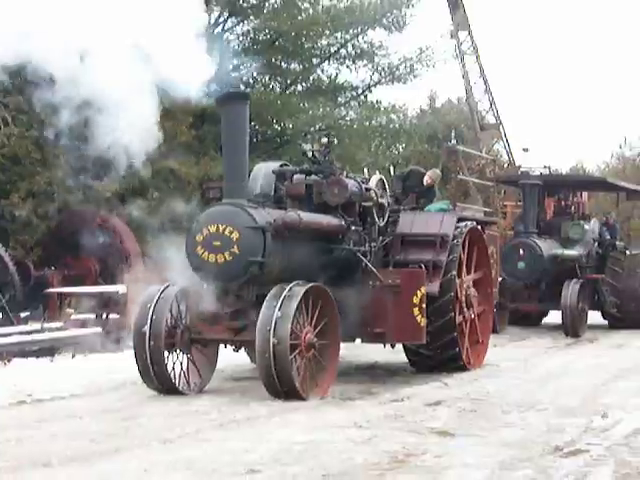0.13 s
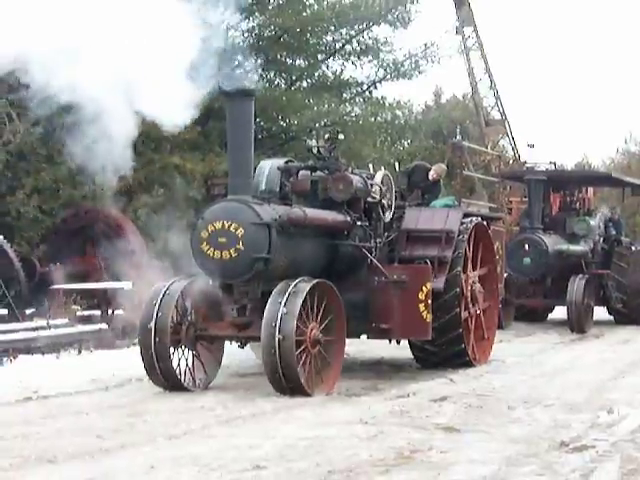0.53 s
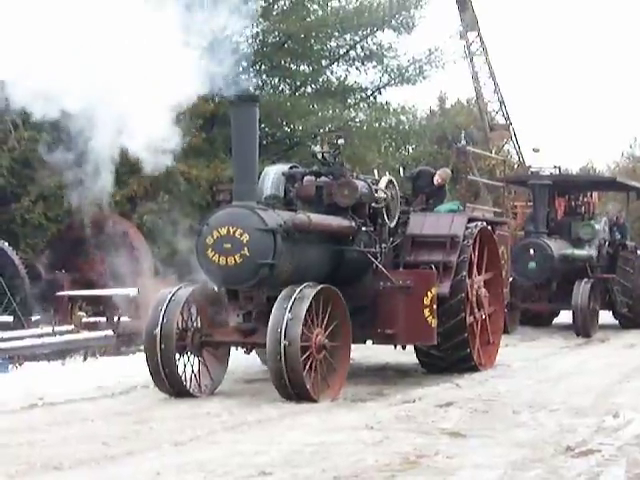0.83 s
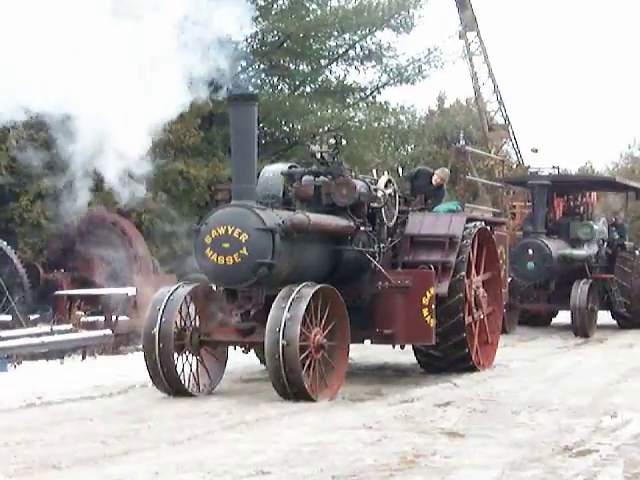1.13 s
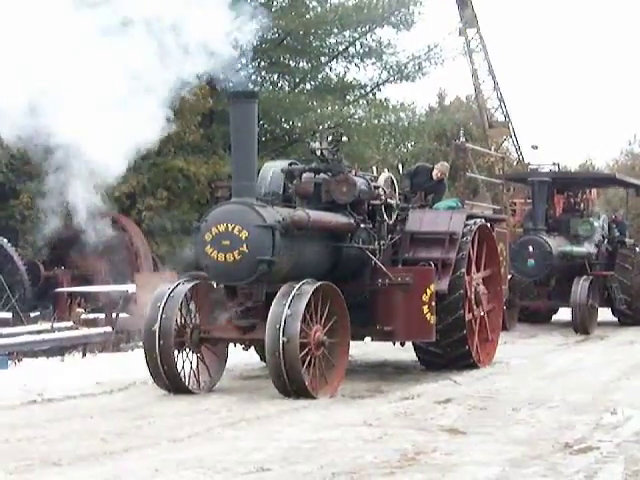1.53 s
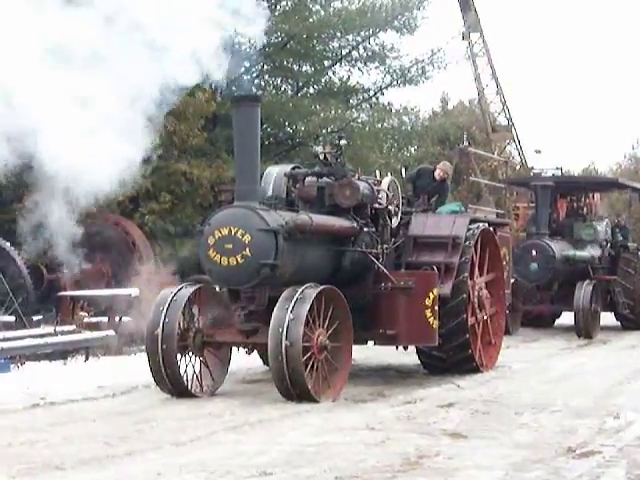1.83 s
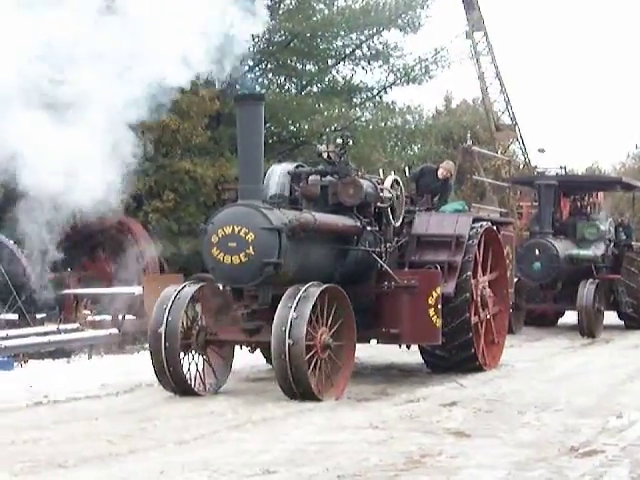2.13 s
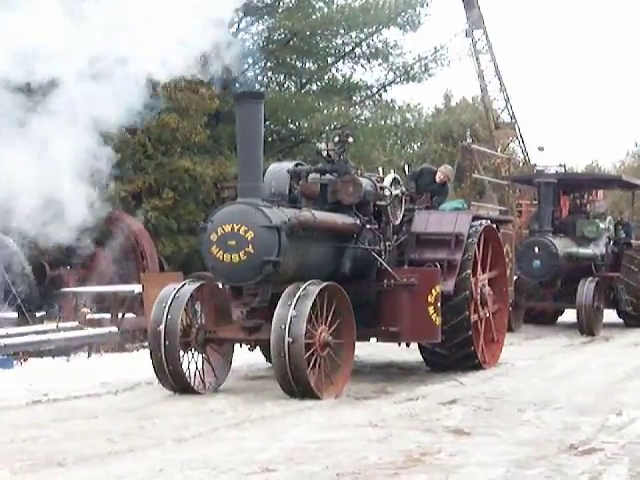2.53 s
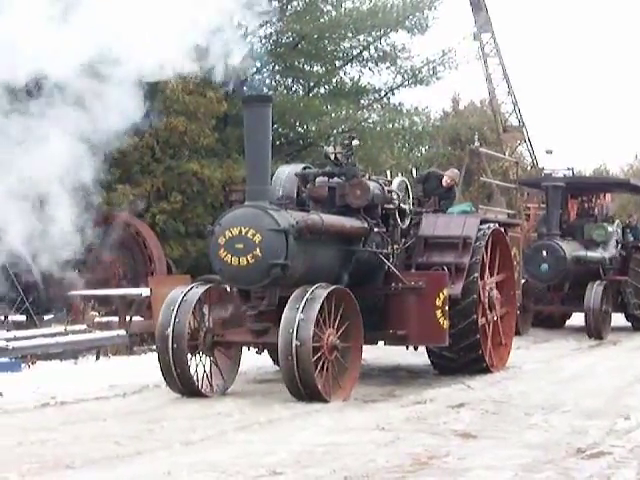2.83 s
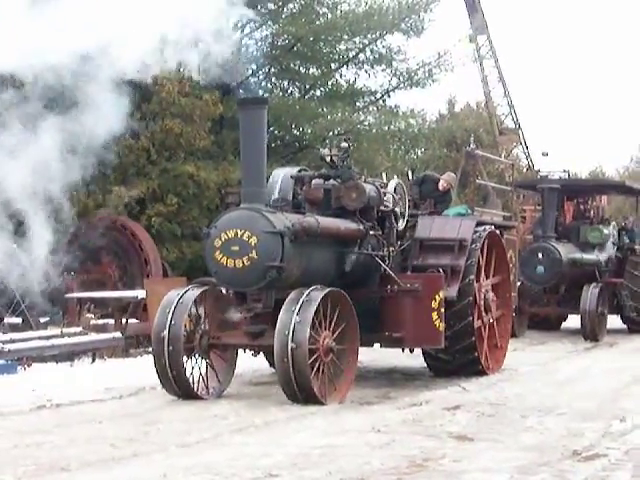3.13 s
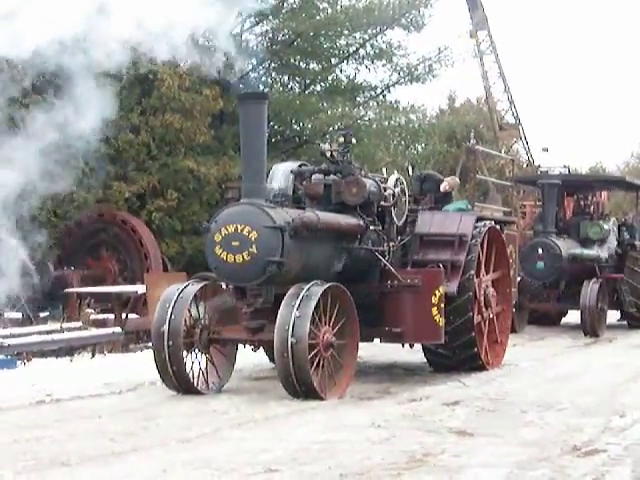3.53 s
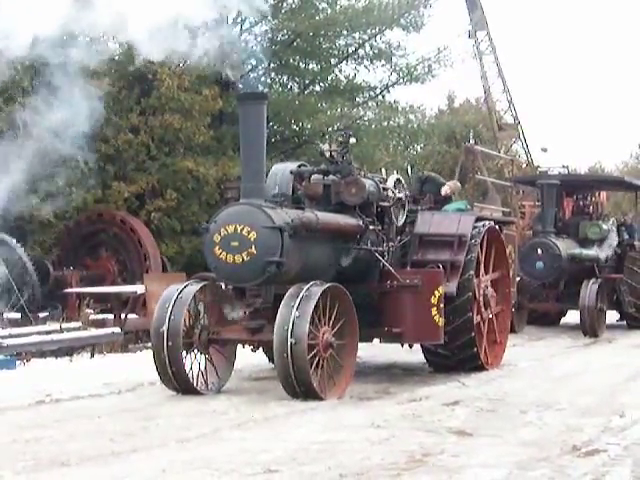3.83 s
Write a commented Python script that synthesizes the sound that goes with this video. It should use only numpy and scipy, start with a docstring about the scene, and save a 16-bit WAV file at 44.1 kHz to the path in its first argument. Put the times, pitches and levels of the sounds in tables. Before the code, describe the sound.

After a brief silence, a slow-rolling steam engine starts abruptly: deep exhaust thumps, clanking gear knocks, bursts of crackling steam, sharp metallic ticks and thin squeaks on the left, the rumble easing later. Outdoors, stereo microphone with dull top.

```python
"""Gravel yard: a steam traction engine rolls slowly. The exhaust thumps, strong and weak in turn, as
pressure pulses with a chimney ring, over gear and wheel rumble made of banded noise and decaying knocks.
Steam hisses in bursts of noise with bursting droplets over a steady leak; the valve gear ticks in decaying
sines and noise cracks, a dry bearing squeaks in gliding near sines, and one deep hum swells and fades."""
import sys
import numpy as np
from scipy import signal
from scipy.fft import rfft, irfft
from scipy.io import wavfile

SR = 44100
rng = np.random.default_rng(int(sys.argv[2]) if len(sys.argv) > 2 else 0)


def wav_record(signal):
    """Record a signal, one row per channel, as 16-bit PCM in the file named by sys.argv[1]."""
    frames = np.transpose(np.atleast_2d(signal))
    bounded = np.clip(frames, -1, 1)
    # unit amplitude maps onto the largest positive 16-bit level
    quanta = np.round(bounded * 32767).astype(np.int16)
    wavfile.write(sys.argv[1], SR, quanta)


N = 176400

# Stereo lean of noise and droplets. Each row: frequency in Hz, left minus right in dB.
LEAN = [(30, -4), (130, 3.5), (300, 2), (560, 1.5), (1180, 2.5), (1720, 1), (2500, -3), (3620, -5),
        (4500, -5.5), (5260, 7), (6500, 15.5), (7640, 2)]


def amp(db):
    """Amplitude factor of a level in dB."""
    return 10 ** (np.asarray(db) / 20)


def rms_one(x):
    """Scales to an rms of 1."""
    return x / np.sqrt(np.mean(x ** 2) + 1e-20)


def in_time(rows):
    """Interpolates each column over the samples; the first column is time in seconds."""
    s, *columns = np.transpose(rows)
    return [np.interp(np.arange(N) / SR, s, c) for c in columns]


def at_hz(points, hz):
    """Reads a (Hz, value) table on a log frequency axis."""
    points = np.array(points)
    return np.interp(np.log(hz), np.log(points[:, 0] + 1e-9), points[:, 1])


def drift(corner_hz):
    """Slow random signal with rms 1: twice low-passed noise, made at SR / 40."""
    step, settle = 40, 2000
    r = np.exp(-2 * step * np.pi * corner_hz / SR)
    noise = rng.standard_normal(N // step + settle + 2)
    slow = signal.lfilter([1], [1, -2 * r, r * r], noise)[settle:]
    return np.interp(np.arange(N) / step, np.arange(len(slow)), rms_one(slow))


def add(out, s, sound):
    """Mixes a sound in at a time in seconds."""
    i = int(s * SR)
    out[..., i:i + sound.shape[-1]] += sound[..., :N - i]


def late(x, s):
    """Delays by a time in seconds."""
    return np.interp(np.arange(N) - s * SR, np.arange(N), x, left=0)


def pan(left_right_db):
    """Left and right gains that differ by this many dB."""
    return amp([[left_right_db / 2], [-left_right_db / 2]])


def dull(x):
    """Takes the top off ticks and crackle on their way to the microphone."""
    return signal.sosfilt(signal.butter(4, 6570, fs=SR, output="sos"), x + 1e-18)


def coloured(source, colour, swing_db, patchy_db, flicker_hz):
    """Two noises in third-octave bands, each with its level law, flicker, lean and likeness."""
    # Each row: frequency in Hz, left-right likeness (0-1).
    likeness = [(30, 0.89), (300, .99), (700, 0.87), (1100, .75), (1800, 0.37), (2800, 0.34), (5000, 0.17),
                (8000, 0.3)]
    low_hz, high_hz = colour[0][0], colour[-1][0]
    hz = np.maximum(np.arange(N // 2 + 1) * SR / N, 1)
    shape = amp(at_hz(colour, hz)) * (hz > low_hz) * (hz < high_hz)
    spectrum = rfft(source) * shape / np.sqrt(np.mean(shape ** 2))
    out, together = 0, drift(flicker_hz)
    for mid_hz in low_hz * 2 ** np.arange(0, np.log2(high_hz / low_hz) + .34, 1 / 3):
        mask = np.cos(np.pi / 2 * np.clip(3 * np.log2(hz / mid_hz), -1, 1)) ** 2
        mid, side = irfft(spectrum * mask, N)
        alike = np.clip(at_hz(likeness, mid_hz), 0, 1)
        flicker_db = patchy_db * (0.37 * together + drift(flicker_hz))
        gain = amp(swing_db(mid_hz) + flicker_db) / np.sqrt(2)
        stereo = np.sqrt(1 + alike) * mid + np.sqrt(1 - alike) * side * [[1], [-1]]
        out = out + gain * pan(at_hz(LEAN, mid_hz)) * stereo
    return out


def chuffs():
    """Each beat pushes, dips sharply and rebounds, echoed by a shed wall; the dip rings the chimney."""
    # Each row: dip time in seconds, dip depth in dB, dip width (two sigmas) in ms, chimney ring in dB.
    beats = [(0.432, -9, 5.2, -14), (0.625, -5, 6, -6), (.768, -11.5, 7.2, -27), (.961, -3.5, 4.3, -13.5),
             (1.108, -11, 8.0, -18.5), (1.297, -8, 4.5, -8), (1.443, -11, 6.4, -41), (1.633, -7, 4.8, -9),
             (1.78, -10.5, 6.9, -21.5), (1.973, -5, 5.0, -8.5), (2.12, -11.5, 14, -21),
             (2.316, -3, 3.54, -35), (2.468, -8.5, 8.9, -16.5), (2.657, -6, 3.74, -7),
             (2.812, -11.5, 6.3, -21), (2.999, -7, 4, -25), (3.156, -16, 6.7, -20), (3.35, -8, 4.6, -17.5),
             (3.502, -11.5, 6.6, -26), (3.697, -8.5, 4.7, -15), (3.849, -11, 8.0, -25)]
    # Lead, lag and width in dip sigmas.
    push_share, push_lead, push_width = 0.7, 7.75, 1.6
    rebound_share, rebound_lag, rebound_width = 0.46, 5.5, 1.6
    chimney_hz, chimney_rise_s, chimney_t60_s = 141, 0.012, 0.25
    echo_s, echo_db = 0.0306, -9
    air, rings = np.zeros(N), np.zeros(N)
    u = np.arange(-.06, .3, 1 / SR)  # seconds from the dip
    for s, db, width_ms, ring_db in beats:
        w = 2000 * u / width_ms
        push = push_share * np.exp(-((w + push_lead) / push_width) ** 2 / 2)
        dip = np.exp(-w ** 2 / 2)
        rebound = rebound_share * np.exp(-((w - rebound_lag) / rebound_width) ** 2 / 2)
        add(air, s + u[0], amp(db) * (push - dip + rebound))
        swell = np.clip(u / chimney_rise_s + .5, 0, 1) * amp(-60 * np.maximum(u, 0) / chimney_t60_s)
        add(rings, s + u[0], -amp(ring_db) * swell * np.cos(2 * np.pi * chimney_hz * u))
    return (air + amp(echo_db) * late(air, echo_s) + rings) * pan(-.6)


def rumble():
    """Lumpy noise of gears and wheels in the resonances of boiler and wheels."""
    # Each row: time in seconds, level in dB, deep bass level in dB, both before the settings below.
    levels = [(0.37, -21, -47), (0.38, -26, -21), (0.43, -14.5, -57), (0.47, -22, -26), (0.49, -13.5, -34),
              (0.51, -21, -24.5), (0.64, -21.5, -34.5), (0.75, -20.5, -25.5), (0.83, -21.5, -26.5),
              (0.97, -22, -44.5), (1.0, -21.5, -22.5), (1.22, -21, -33.5), (1.24, -18.5, -11),
              (1.3, -21, -31), (1.32, -14, -32.5), (1.39, -23.5, -29.5), (1.55, -24, -28.5),
              (1.97, -24, -32), (1.98, -19.5, -32), (2.06, -27, -27), (2.08, -20.5, -17),
              (2.11, -26.5, -31), (2.19, -21.5, -34.5), (2.21, -28, -27), (2.25, -17, -23),
              (2.35, -21, -34.5), (2.68, -22.5, -40), (2.79, -33.5, -53), (3.06, -29, -35.5),
              (3.28, -30.5, -44), (3.33, -28, -36.5), (3.7, -31, -40), (3.82, -23.5, -42.5),
              (3.93, -33, -34.5), (3.95, -28, -35.5), (4.0, -33, -45)]
    # Each row: frequency in Hz, relative density in dB per Hz.
    colour = [(12, -61), (20, -24.5), (27, -5.5), (49, 2.5), (103, -4), (196, -10), (260, -7.5), (318, 0.5),
              (374, -4), (584, -15.5), (790, -13.5), (948, -22.5), (1030, -17.5), (1260, -26.5),
              (1740, -24.5), (1960, -28.5), (2500, -29), (3250, -63), (5500, -120)]
    bass_below_hz, trim_db, bass_follows = 160, 2, 0.34
    level_db, bass_db = in_time(levels)
    # Bass swings are shrunk and centred on the mean level.
    bass_db = level_db.mean() + bass_follows * (bass_db - bass_db.mean())

    def swing_db(hz):
        return trim_db + (bass_db if hz < bass_below_hz else level_db)

    return coloured(rng.standard_normal((2, N)), colour, swing_db, patchy_db=2.0, flicker_hz=13)


def knocks():
    """Heavy knocks in the gear train: sines with a quick rise and exponential decay."""
    # Each row: start in seconds, level in dB before the trim, pitch in Hz.
    rows = [(0.397, -0.5, 447), (0.415, -7, 330), (0.428, -12, 326), (0.484, -4, 318), (0.534, -13, 334),
            (0.902, -3, 376), (0.944, 3.5, 455), (1.23, 2.5, 343), (1.304, -15, 398), (1.319, -3, 323),
            (1.355, -13, 326), (1.692, -13, 358), (1.974, 2, 350), (2.22, -13, 285), (2.278, -8, 344),
            (2.407, -20, 330), (2.55, -8, 355)]
    t60_s, rise_s, trim_db = 0.065, 0.0049, -10
    out, u = np.zeros((2, N)), np.arange(0, .2, 1 / SR)
    for s, db, hz in rows:
        envelope = np.minimum(u / rise_s, 1) * amp(db + trim_db - 60 * u / t60_s)
        add(out, s, envelope * np.sin(2 * np.pi * hz * u) * pan(1.6))
    return out


def steam():
    """Jet noise with droplets spattering and crackling in it; fuller bursts reach lower."""
    # Each row: time in seconds, level in dB before the trim, lift of the lower hiss in dB (mean removed).
    bursts = [
        [(0.345, -41, 8), (0.369, -31.5, 0.5), (0.519, -36.5, 3), (0.585, -31, -8.5), (0.631, -42, 7),
         (0.685, -27.5, 2), (0.695, -19.5, -8.5), (0.817, -34, 1), (0.861, -31.5, -2.5), (0.907, -41, 3),
         (0.921, -20.5, -3), (0.941, -27, -2), (0.953, -19, 3.5), (0.973, -26.5, 0.5), (1.043, -26.5, -0.5),
         (1.053, -21, -8), (1.063, -26, -1), (1.103, -33, 3.5), (1.169, -40, -2), (1.203, -26.5, 3.5),
         (1.303, -34, -1.5), (1.385, -26, -7), (1.389, -37, 3), (1.439, -38.5, -7), (1.465, -25.5, -12.5),
         (1.475, -37.5, 0), (1.565, -29, 4), (1.601, -35, -1), (1.611, -28.5, 3), (1.715, -30.5, -0.5),
         (1.725, -23.5, -10), (1.735, -36, -5.5), (1.911, -33, 3.5), (1.973, -26, -9), (1.983, -21.5, -11),
         (2.013, -24.5, -9.5), (2.063, -25.5, -8), (2.083, -37, 0.5), (2.107, -36.5, -4), (2.15, -38, 4.5)],
        [(2.16, -38, 1), (2.174, -34, -10.5), (2.194, -39, -1), (2.21, -24.5, -8), (2.276, -23.5, 5.5),
         (2.364, -30.5, -1), (2.39, -29, -9), (2.4, -31, -4), (2.554, -37, 7.5), (2.626, -34.5, -8.5),
         (2.646, -19, -15.5), (2.656, -30, 1.5), (2.692, -23, 0.5), (2.698, -30, 6.5), (2.712, -26, -8),
         (2.722, -40.5, 2), (2.734, -17, -6.5), (2.764, -38, 0), (2.99, -40, -0.5), (3.04, -31.5, 9),
         (3.056, -29, -10), (3.066, -38, 4.5), (3.148, -43, -4), (3.174, -45, 9), (3.286, -38, -6.5),
         (3.302, -28.5, -11), (3.338, -22.5, -15), (3.354, -32, -1), (3.374, -24.5, -2), (3.43, -46.5, 0.5),
         (3.466, -33.5, -1.5), (3.512, -34.5, 2.5), (3.522, -30.5, -1), (3.67, -38.5, -1), (3.696, -46, 1),
         (3.706, -30, -8.5), (3.712, -37, -2.5), (3.942, -43.5, 0.5), (3.988, -21, -5), (4.0, -25, -8)],
    ]
    # Each row: frequency in Hz, relative density in dB per Hz.
    colour = [(410, -21), (700, -9.5), (783, -5.5), (914, -11.5), (1080, -11.5), (1250, -7.5), (1810, -7.5),
              (2340, -10), (2620, -7.5), (2880, -4.5), (4160, -5), (4650, 0.5), (5050, -4.5), (5600, 2.5),
              (6660, -15), (7230, -18.5), (8090, -23.5), (10500, -60.5), (17800, -120)]
    full_below_hz, trim_db, spatter_per_s, spatter_db = 5330, 5.5, 460, -16.5
    level_db, full_db = in_time(np.vstack(bursts))
    lift_db = full_db - full_db.mean()
    sizes = amp(2.2 * np.minimum(rng.exponential(1, N), 4)) * rng.choice([-1, 1], N)
    drops = rms_one((rng.random(N) < spatter_per_s / SR) * sizes)
    jet = rms_one(rng.standard_normal((2, N)) + amp(spatter_db) * drops * [[1], [0]])

    def swing_db(hz):
        return trim_db + level_db + lift_db * np.clip(np.log2(full_below_hz / hz) * 0.84, 0, 1)

    hiss = coloured(jet, colour, swing_db, patchy_db=2.67, flicker_hz=25.8)
    return hiss + dull(crackle(level_db))


def crackle(level_db):
    """Droplets burst more often in strong steam; each rings briefly at one of twelve pitches and places."""
    bursts_per_s, trim_db, low_hz, high_hz, t60_cycles = 200, 2, 1840, 6650, 9.1
    rate = bursts_per_s * amp(level_db - level_db.mean() + 5.0 * drift(20))
    born = rng.random(N) < rate / SR
    sizes = born * amp(1.8 * np.minimum(rng.exponential(1, N), 4)) * rng.choice([-1, 1], N)
    out, dealt = 0, rng.integers(0, 12, N)
    for k, hz in enumerate(np.geomspace(low_hz, high_hz, num=12)):
        r, w = amp(-60 * hz / (t60_cycles * SR)), 2 * np.pi * hz / SR
        hits = sizes * (dealt == k) + 1e-18
        ring = signal.lfilter([0, np.sin(w)], [1, -2 * r * np.cos(w), r * r], hits)
        out = out + pan(at_hz(LEAN, hz)) * ring
    return amp(trim_db + level_db) * out


def ticks():
    """Valve gear ticks: a metal ring with a bounce, a dry crack of dying noise, a thinner echo from the left."""
    # Each row: start in seconds, level in dB before the trim, pitch in Hz, left minus right in dB,
    # dry crack under the ring in dB, crack t60 in seconds.
    rows = [(0.3604, -9, 5000, -8, -2, 0.05), (0.7774, -8, 5430, 6, -4, 0.05),
            (0.9183, -17, 5500, 11, -2, 0.05), (0.9507, -17, 5670, 3.5, -8, 0.05),
            (1.052, -24, 5670, 9, -5, 0.05), (1.3637, 0, 4640, -12, -11.5, 0.03),
            (1.4453, -3.5, 4780, -4, -9, 0.05), (1.542, -12, 5440, 1, 1, 0.05),
            (1.6102, -12.5, 4720, -2.5, 7, 0.05), (1.6128, -17, 5300, 4, -7, 0.05),
            (1.7033, -12.5, 4960, -6, 1, 0.056), (1.7714, -20, 4400, -15, -9, 0.05),
            (1.978, -11.5, 5660, 13, -4, 0.05), (2.0295, -5.5, 5300, -3.5, -6.5, 0.05),
            (2.3699, -7, 4840, -10, -2.5, 0.055), (2.64, -9.5, 5240, 9, -10.5, 0.05),
            (2.686, -5, 5550, 4.5, 0, 0.05), (2.6887, -6, 4560, 2, 1, 0.042),
            (2.7333, -7.5, 4040, 5, 0, 0.055), (2.9743, -11.5, 4840, -5.0, -5, 0.046),
            (3.0349, -8, 4700, -3, -0.5, 0.055), (3.301, -12, 5640, 4.5, -15, 0.05),
            (3.3749, -8, 4590, -7, -6, 0.04), (3.626, -22, 5170, -3, 4, 0.05),
            (3.6879, -9.5, 4980, -1, 0.5, 0.057)]
    # Each row: multiple of the pitch, level in dB (varied at random per tick), t60 in seconds.
    modes = [(1.0, 5, 0.008), (.72, -12.5, .007), (1.14, -3.5, 0.012), (1.32, -20, .007)]
    trim_db, bounce_s, bounce_db = -2.5, 0.0014, -7.5
    echo_s, echo_db, echo_above_hz, echo_pan_db = .0165, -15, 5000, 19
    crack_band_hz = [1990, 6500]
    out, u = np.zeros((2, N)), np.arange(0, .08, 1 / SR)
    band = signal.butter(2, crack_band_hz, "band", fs=SR, output="sos")
    for s, db, hz, pan_db, crack_db, crack_t60_s in rows:
        ring = np.zeros(len(u))
        for multiple, mode_db, t60_s in modes:
            decay = amp(mode_db + 2.0 * rng.standard_normal() - 60 * u / t60_s)
            ring += decay * np.sin(2 * np.pi * hz * multiple * u)
        noise = rng.standard_normal(len(u))
        crack = signal.sosfilt(band, noise * amp(crack_db - 60 * u / crack_t60_s))
        place = amp(db + trim_db) * pan(pan_db)
        add(out, s, (ring + crack) * place)
        add(out, s + bounce_s, ring * place * amp(bounce_db))
    out = dull(out)
    high_pass = signal.butter(2, echo_above_hz, "high", fs=SR, output="sos")
    echo = signal.sosfilt(high_pass, late(out.mean(axis=0), echo_s) + 1e-18)
    return out + echo * amp(echo_db) * pan(echo_pan_db)


def squeaks():
    """Dry bearing: near sines that swell, glide a little and fade, over a faint narrow ringing."""
    # Each row: start in seconds, length in seconds, rms level at the peak in dB (left), start pitch in Hz,
    # end pitch in Hz, place of the peak (0-1, held within 0.1-0.9).
    rows = [(0.349, 0.094, -17.5, 5310, 5405, 0.45), (0.447, .03, -20.5, 5350, 5350, .4),
            (0.51, .092, -6.5, 5316, 5383, 0.84), (0.604, 0.026, -17.5, 5270, 5360, 0.4),
            (.632, .025, -21, 5430, 5280, .5), (.66, 0.025, -18, 5360, 5400, 0.7),
            (1.205, 0.038, -23, 5410, 5470, .4), (1.573, 0.038, -21, 5330, 5330, 0.5),
            (1.631, 0.075, -25, 5390, 5360, 0.7), (1.877, 0.022, -17.5, 5270, 5300, 0.8),
            (1.911, 0.027, -24, 5450, 5270, 0.6), (1.928, 0.069, -16, 5370, 5360, 0),
            (2.094, .052, -19, 5350, 5400, 0.36), (2.162, 0.021, -19.5, 5380, 5270, 1),
            (2.212, 0.036, -14.5, 5300, 5420, 0.1), (2.286, 0.036, -18.5, 5370, 5470, 0.4),
            (2.543, 0.037, -9, 5330, 5330, 0.6), (2.595, 0.059, -15, 5337, 5400, 0.9),
            (2.773, 0.036, -23, 5250, 5450, 1), (2.899, 0.086, -28.5, 5350, 5390, 0.6),
            (3.07, .1, -19.5, 5300, 5397, 0.42), (3.178, 0.043, -22.5, 5310, 5380, 0.9),
            (3.226, 0.035, -17.5, 5320, 5320, 0.6), (3.258, 0.025, -28, 5330, 5340, .4),
            (3.403, 0.049, -27, 5320, 5330, .5), (3.443, 0.076, -23, 5390, 5310, 0.23),
            (3.572, 0.042, -18.5, 5300, 5330, 0.6), (3.732, 0.052, -22.5, 5340, 5300, .4),
            (3.821, 0.047, -22.5, 5370, 5360, 0.4), (3.925, 0.043, -23.5, 5300, 5310, .6)]
    right_db, waver_hz, bluntness = -19.5, 9.7, 0.85
    whine_hz, whine_width_hz, whine_db = 5330, 67, -33.5
    out, waver = np.zeros(N), waver_hz * drift(30)
    for s, length_s, db, start_hz, end_hz, peak in rows:
        p, i = np.arange(0, 1, 1 / (length_s * SR)), int(s * SR)
        peak = np.clip(peak, .1, .9)
        swell = np.sin(np.pi / 2 * np.minimum(p / peak, (1 - p) / (1 - peak))) ** bluntness
        hz = start_hz + (end_hz - start_hz) * p + waver[i:i + len(p)]
        add(out, s, np.sqrt(2) * amp(db) * swell * np.sin(2 * np.pi * np.cumsum(hz) / SR))
    r, w = np.exp(-np.pi * whine_width_hz / SR), 2 * np.pi * whine_hz / SR
    whine = signal.lfilter([1], [1, -2 * r * np.cos(w), r * r], rng.standard_normal(N))
    return (out + amp(whine_db) * rms_one(whine)) * amp([[0], [right_db]])


def boom():
    """One deep hum: a low sine that swells and fades."""
    start_s, length_s, hz, peak_db = 1.49, 0.1, 63.6, -13
    u, out = np.arange(0, length_s, 1 / SR), np.zeros(N)
    add(out, start_s, amp(peak_db) * np.sin(np.pi * u / length_s) * np.sin(2 * np.pi * hz * u))
    return out


def leak():
    """Leaking glands: a smooth, steady hiss of coloured noise under everything."""
    # Each row: time in seconds, level in dB before the trim.
    levels = [(0.55, -32.5), (1.17, -32), (2.07, -35), (2.47, -30.5), (2.98, -37.5), (4.0, -40.5)]
    # Each row: frequency in Hz, relative density in dB per Hz.
    colour = [(530, -38), (900, -4.5), (1050, -7), (1230, -22.5), (1460, -15), (2540, -12.5), (2970, -6.5),
              (4210, -10.5), (4700, 0), (5060, -5.5), (5200, -5), (5500, -0.5), (5650, -7), (7180, -19.5),
              (8090, -34), (10500, -58), (17800, -120)]
    trim_db = 0.5
    level_db, = in_time(levels)
    noise = rng.standard_normal((2, N))
    return coloured(noise, colour, lambda hz: trim_db + level_db, patchy_db=-0.5, flicker_hz=7.1)


def at_ports(x, lag_s):
    """The right microphone port hears a little later."""
    return np.array([x[0], late(x[1], lag_s)])


def scene():
    """Sums the sources; exhaust and rumble come from nearer the middle, so lag less."""
    low = at_ports(chuffs() + rumble() + knocks() + boom(), lag_s=.0001)
    high = at_ports(steam() + ticks() + squeaks() + leak(), lag_s=0.00022)
    return low + high


def record(dry):
    """Unequal bass cuts, silence until the start, rounded peaks, a cut top."""
    # Bass cut of the left and right capsule in Hz.
    bass_cut_hz = [42.5, 4.7]
    start_s, clip_top, top_stop_hz = 0.3344, 2.6, 9047
    heard = np.array([signal.lfilter(*signal.butter(1, hz, "high", fs=SR), x)
                      for x, hz in zip(dry, bass_cut_hz)])
    heard = heard * (np.arange(N) > start_s * SR)
    rounded = clip_top * np.tanh(heard / clip_top)
    return signal.sosfilt(signal.cheby2(16, 75, top_stop_hz, fs=SR, output="sos"), rounded)


dry = scene()
out = record(dry)
wav_record(out)
```